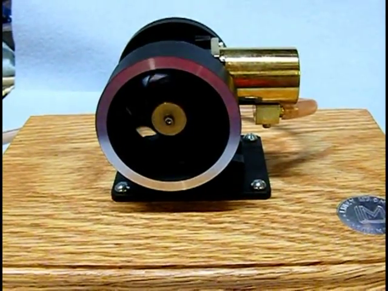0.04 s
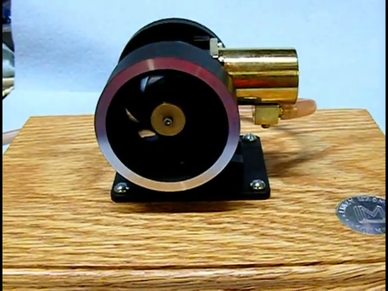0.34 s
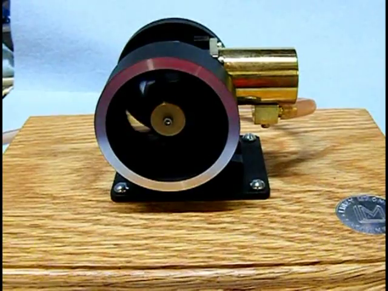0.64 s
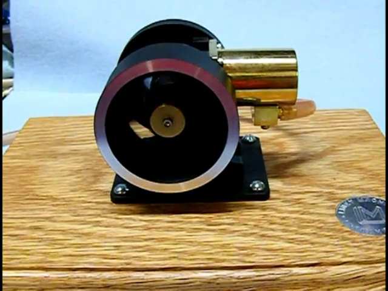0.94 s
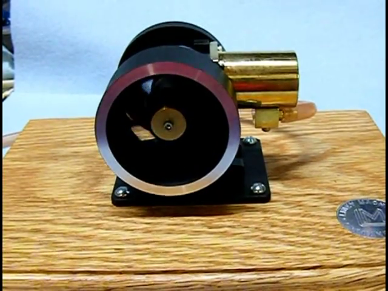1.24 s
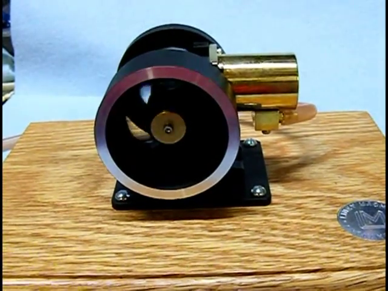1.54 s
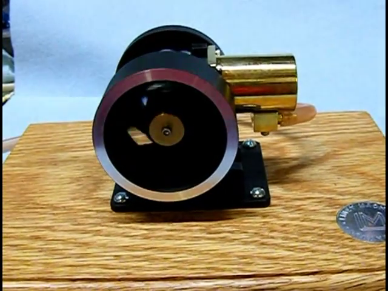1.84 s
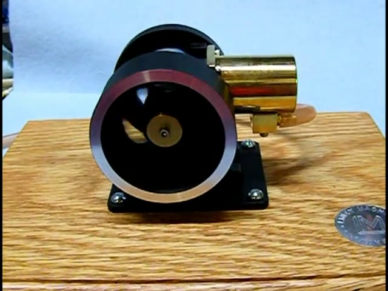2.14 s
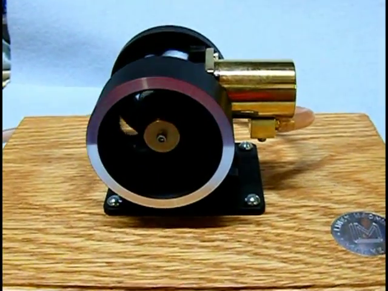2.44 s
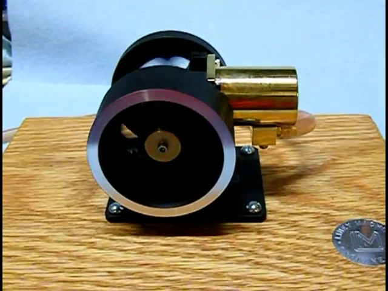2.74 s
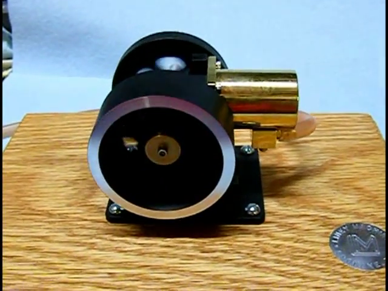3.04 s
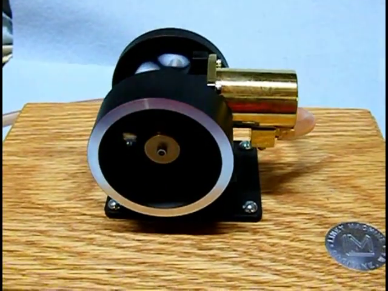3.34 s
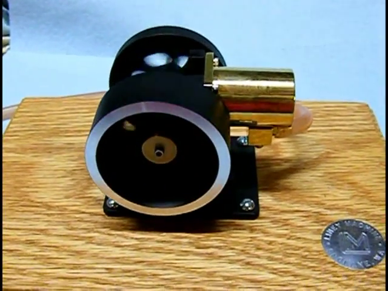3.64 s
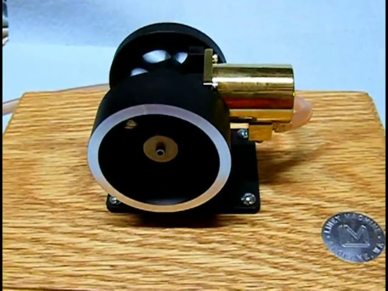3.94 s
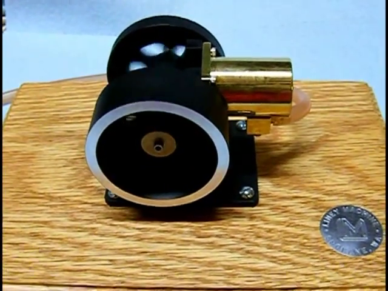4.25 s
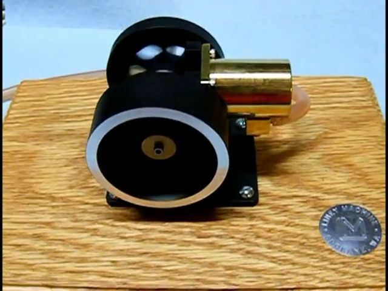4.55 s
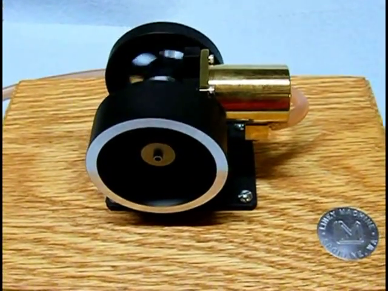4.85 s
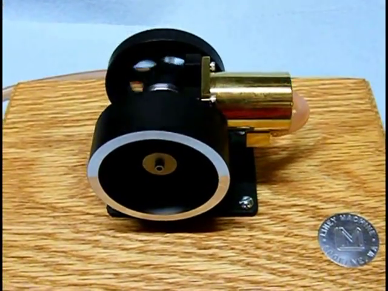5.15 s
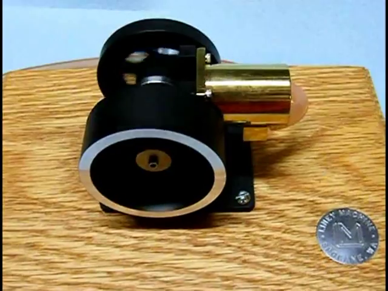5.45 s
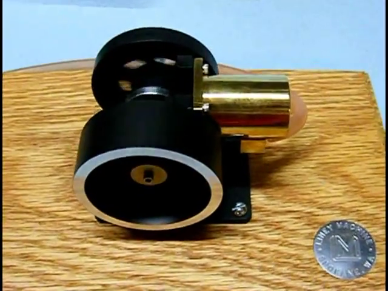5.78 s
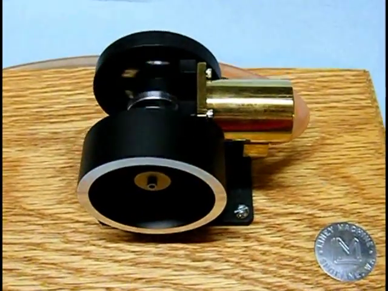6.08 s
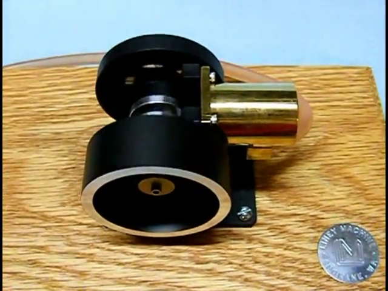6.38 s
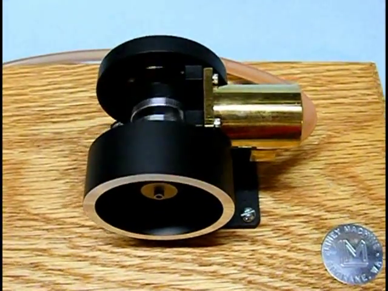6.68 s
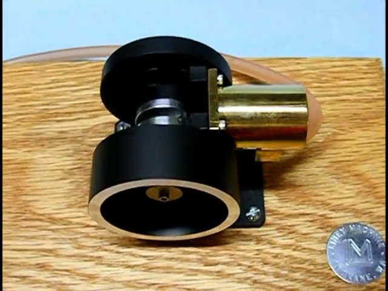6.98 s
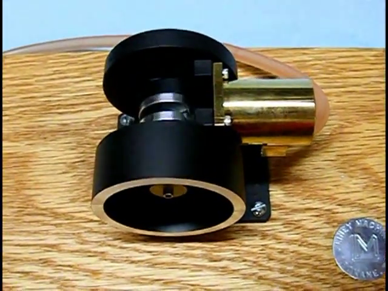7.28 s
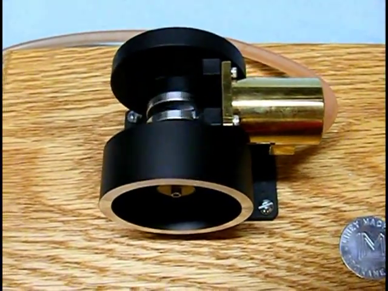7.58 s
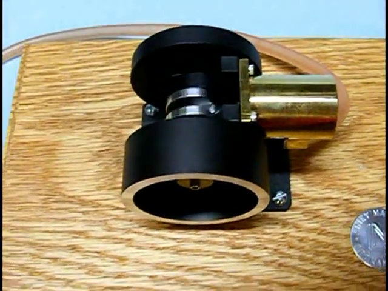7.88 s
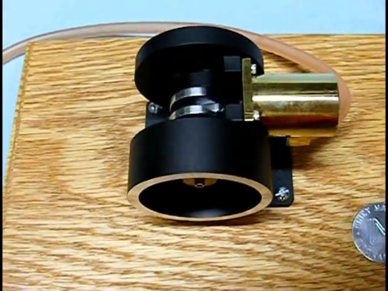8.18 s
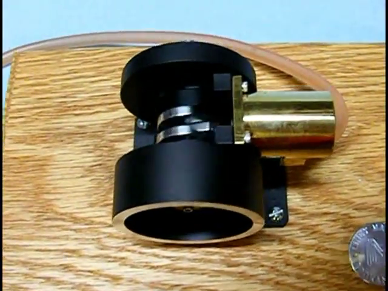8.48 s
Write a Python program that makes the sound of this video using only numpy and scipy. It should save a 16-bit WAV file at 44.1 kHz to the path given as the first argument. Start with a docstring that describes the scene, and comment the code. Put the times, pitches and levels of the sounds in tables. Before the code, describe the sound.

A small one-cylinder model engine runs on air on a wooden board, turning about three and a half times a second. Each turn gives a light metallic tick, a small knock and a faint puff. An air pump hums and fans whirr steadily throughout. The close microphone rises slowly over the engine, making the knocks a little fuller, and two brief dry scrapes come in the second half. The room is small and fairly dry.

```python
"""From the start an air pump buzzes through its line and fans whirr over a steady rush of air.
The pump drives a small one-cylinder model engine on a wooden board at 3.4 turns a second. In each turn
the valve rubs back, chirps by stick-slip friction, ticks and rebounds; exhaust puffs out, and the rod
knocks in its bearings, each impact ringing damped modes. From 1.5 s a close microphone rises slowly
over the engine, and near 5.9 s and 7.4 s come two brief dry scrapes."""
import sys
import numpy as np
from scipy import signal
from scipy.fft import rfft, irfft
from scipy.io import wavfile
from scipy.ndimage import uniform_filter1d

SR = 44100
rng = np.random.default_rng(int(sys.argv[2]) if len(sys.argv) > 2 else 0)


def file_out(sig):
    """Save sig as 16-bit WAV at sys.argv[1]."""
    # one column per channel
    cols = np.atleast_2d(sig).T
    # limit, then scale
    lim = np.clip(cols, -1, 1)
    pcm = np.round(lim * 32767).astype(np.int16)
    wavfile.write(sys.argv[1], SR, pcm)


N = 375732
TIME = np.arange(N) / SR
PUMP_HZ = 60.04  # stroke rate of the diaphragm

# once a turn the rod takes up its play: t/s, level/dB
ROD_KNOCKS = [(0.2272, -19), (0.519, -14.5), (0.8056, -19.5), (1.0938, -19), (1.3899, -22.5),
              (1.6743, -22.5), (1.9617, -19), (2.2713, -22.5), (2.546, -16.5), (2.854, -19),
              (3.1312, -14.5), (3.4386, -22), (3.7146, -14), (4.0129, -15.5), (4.3138, -14.5),
              (4.6085, -17.5), (4.8955, -15), (5.1956, -14.5), (5.4971, -14), (5.7863, -19.5), (6.068, -16),
              (6.3515, -19.5), (6.6427, -16), (6.9497, -16), (7.227, -14), (7.5372, -19), (7.8234, -17.5),
              (8.1229, -17), (8.4108, -14)]
# low modes of the frame: f/Hz, level/dB, t60/s
THUD_MODES = [(1134, 3, 0.026), (1050, -17, 0.012), (1354, -11.5, 0.0093)]
# the top of the valve gear comes into view: t/s, level/dB
GEAR_VIEW = [(0, -6), (2.7, -4.5), (4.5, -2), (6, 1.5), (8.5, 3)]


def amp(db):
    """Amplitude ratio of a level in decibels."""
    return 10 ** (np.asarray(db) / 20)


def unit_rms(x):
    """Normalisation to rms 1."""
    return x / np.sqrt(np.mean(x ** 2) + 1e-20)


def curve(rows, column=1):
    """Linear interpolation of a table column in time."""
    columns = np.transpose(rows)
    return np.interp(TIME, columns[0], columns[column])


def add(mix, s, sound):
    """Superposition of a sound on the mix, starting at s seconds."""
    part = mix[max(round(s * SR), 0):][:len(sound)]
    part += sound[:len(part)]


def noise(spectrum):
    """Spectral shaping of white noise, at rms 1."""
    hz, db = np.transpose(spectrum)
    gain = amp(np.interp(np.log(np.fft.rfftfreq(N, 1 / SR) + 1), np.log(hz), db))
    return unit_rms(irfft(rfft(rng.standard_normal(N)) * gain, N))


def drift(hz):
    """Low-pass random fluctuation of rms 1."""
    steps = np.arange(0, N / SR + 1, 1 / (2 * hz))
    wander = np.interp(TIME, steps, rng.standard_normal(len(steps)))
    return unit_rms(uniform_filter1d(wander, int(SR / hz / 4)))


def height():
    """Position of the microphone as it rises through the room's standing waves, from -.5 to .5."""
    return np.clip((TIME - 1.5) / 6.9, 0, 1) - .5


def valve_times(lead_s=.0669, slow_turn_share=.125):
    """Phase lead: the valve ticks about a quarter turn before each knock, earlier in a slow turn."""
    knock_s = np.transpose(ROD_KNOCKS)[0]
    turn_s = np.diff(knock_s)
    return knock_s - lead_s - slow_turn_share * np.r_[0, turn_s - turn_s.mean()]


def crank():
    """Phase of the crank in turns, whole at each valve tick."""
    ticks = valve_times()
    ticks = np.r_[2 * ticks[0] - ticks[1], ticks, 2 * ticks[-1] - ticks[-2]]
    return np.interp(TIME, ticks, np.arange(len(ticks)))


def pump(turns, bend_rad=1.39, waver_rad=0.11, throb=0.65, waver_db=0.78):
    """Modulation: through the air line, piston and valve swell and bend the diaphragm's harmonics."""
    # pump buzz: harmonic number, level/dB, swing with the crank (0-1), gain over the rise/dB
    harmonics = [(1, -50.5, 0, 0), (2, -34, 0.2, 1.5), (3, -46, 0.1, 6), (4, -41.5, 0.99, 3.5),
                 (5, -47.5, 0.8, -0.5), (6, -48.5, 0.8, 2), (8, -49, 0.92, 3.5), (9, -63.5, 0.96, 8),
                 (10, -45.5, 0.9, 2), (11, -46, 0.6, 10), (12, -59, 0, 6.5), (13, -50, 1, -1.5),
                 (15, -50, 0.7, 0.5), (17, -59.5, 0.2, -13), (19, -47, 0.5, -4), (20, -50.5, 1, 2.57),
                 (21, -59, 0.3, -3), (22, -50.5, 0.8, -3), (23, -58, 0.97, -2.5), (24, -52.5, 1, 1.5),
                 (25, -56.5, 0.6, -7.5)]
    highest = round(harmonics[-1][0])
    fading_top = [(highest + k + 1, -58.5 - 0.4 * k, .8, 0) for k in range(20)]
    out, rise = np.zeros(N), height()
    unsteady = waver_rad * drift(hz=5)
    for order, db, swing, rise_db in harmonics + fading_top:
        start, place, lag = rng.random(3)
        angle = 2 * np.pi * (turns + place)
        phase = 2 * np.pi * (round(order) * PUMP_HZ * TIME + start)
        phase += swing * (bend_rad * np.sin(angle + 2 * (lag - .5)) + unsteady)
        swell = 1 + throb * swing * np.cos(angle)
        out += amp(db + rise_db * rise) * unit_rms(swell * np.sin(phase))
    return out * amp(waver_db * drift(hz=5))


def fans(waver_db=1, wander_rad=0.45):
    """Tonal noise of fans in the room, with slow random modulation of phase and level."""
    # fan tones: f/Hz, level/dB, gain over the rise/dB
    tones = [(134.1, -44.5, 2), (253.07, -41.5, 1), (307.6, -49.5, 1), (406, -59, -1), (614.6, -43, 0.5),
             (922.5, -43.5, -4), (1980, -54, 1)]
    out = np.zeros(N)
    for hz, db, rise_db in tones:
        phase = 2 * np.pi * (hz * TIME + rng.random()) + wander_rad * drift(hz=1.5)
        out += amp(db + rise_db * height() + waver_db * drift(hz=2)) * unit_rms(np.sin(phase))
    return out


def air(turns, rumble_db=-34.1, rush_db=-35, flutter_depth=0.16):
    """Modulated noise: the board rumbles with each turn, the air flutters with both pump strokes."""
    # spectral densities of the low rumble, the rush of air and its treble edge: f/Hz, level/dB
    rumble_spectrum = [(15, -38.5), (35, -13.5), (52, -19), (77, 2), (95, -9), (135, 4.5), (200, 6.5),
                       (245, -3.5), (290, 4.5), (325, -5), (360, -1.5), (420, -16.5), (700, -69.5)]
    rush_spectrum = [(200, -6), (400, -1), (620, 3.5), (900, 0), (1180, -3.5), (1400, -4), (2000, -8),
                     (2700, -11.5), (3350, -16), (4100, -24.5), (5500, -32), (6500, -42), (7500, -57.5)]
    rush_edge = [(8600, -75), (10000, -100)]
    roll_db = 0.4 * np.cos(2 * np.pi * (turns - 0.902))
    rumble = noise(rumble_spectrum) * amp(rumble_db + 0.8 * height() + roll_db)
    rush = noise(rush_spectrum + rush_edge) * amp(rush_db + 0.9 * height())
    flutter = 1 + flutter_depth * np.sin(2 * np.pi * 2 * PUMP_HZ * TIME)
    return rumble + rush * flutter


def scuff(turns, db=-39, centre_turns=0.6267, width_turns=0.023):
    """Sliding friction: a faint rub as the valve moves back."""
    # spectrum of the rub: f/Hz, level/dB
    spectrum = [(500, -24.5), (1150, 6), (2000, -11), (2750, -2), (3120, 0), (3600, -13), (6000, -31),
                (8000, -55), (15000, -72)]
    swell = np.exp(-((turns % 1 - centre_turns) / width_turns) ** 2)
    return amp(db) * noise(spectrum) * swell


def chirp(hz=3110, length_s=0.00724, glide=0.037, rough_rad=0.14):
    """Stick-slip friction: the sliding valve gives a short, slightly falling squeak."""
    progress = np.linspace(0, 1, int(length_s * SR))
    pitch = hz * (1 + 0.0034 * rng.standard_normal() + glide * (.5 - progress))
    jitter = rng.standard_normal(len(progress))
    slip = unit_rms(signal.fftconvolve(jitter, signal.windows.hann(SR // 800), "same"))
    envelope = unit_rms(np.sin(np.pi * progress ** 1.3) ** 2)
    return envelope * np.sin(2 * np.pi * np.cumsum(pitch) / SR + rough_rad * slip)


def unit_blow(sound):
    """Normalisation to the energy of 10 ms at rms 1."""
    return sound / np.linalg.norm(sound) * np.sqrt(SR / 100)


def strike(partials, contact_s, chatter, tune=1, give_s=0.00033, spread=.006):
    """Impulse response: a blow with a brief chatter of contact excites damped sinusoids."""
    t = np.arange(SR // 20) / SR
    ring = np.zeros(len(t))
    for k, (hz, db, t60) in enumerate(partials):
        pitch = hz * tune * (1 + spread * rng.standard_normal())
        polarity = (-1) ** k  # neighbouring partials swing in opposition
        ring += polarity * amp(db - 60 * t / t60) * np.sin(2 * np.pi * pitch * t)
    ring *= (1 - np.exp(-t / give_s)) ** 3  # the metal gives before it rings
    force = rng.standard_normal(len(t)) * (t / contact_s) * np.exp(-2 * t / contact_s)
    force *= chatter / np.linalg.norm(force)
    force[0] += 1
    return unit_blow(signal.fftconvolve(force, ring)[:len(t)])


def valve(chirp_lead_s=.0268, rebound_lag_s=0.028):
    """Friction, then impact: the valve chirps, ticks evenly and rebounds, more clearly from above."""
    # ringing modes of the valve tick, and faint thin tones above 8 kHz that sound with each tick: f/Hz,
    # level/dB, t60/s
    tick_partials = [(3155, 8.5, 0.011), (3430, -11.5, 0.0093), (3700, -18.5, .010), (4900, -36, .007),
                     (7250, -36.5, .009), (8950, -39.5, .008), (12400, -44, .007), (14500, -45.5, .007)]
    # modes of the top of the valve gear: f/Hz, level/dB, t60/s
    top_modes = [(1770, -8, .006), (2120, -2.5, 0.0044), (2584, 6.5, 0.0099), (2940, 0.5, 0.0051),
                 (3700, -7.5, 0.013)]
    out, times = np.zeros(N), valve_times()
    top_db, rise = curve(GEAR_VIEW), height()
    for s, scatter in zip(times, rng.standard_normal(len(times))):
        now = int(s * SR)
        top = amp(top_db[now])
        balance = np.hypot(1, top)  # holds the tick's energy as its timbre shifts
        add(out, s - chirp_lead_s, amp(-32 - rise[now]) * chirp() / balance)
        tick = strike(tick_partials, contact_s=0.00044, chatter=0.28)
        tick += top * strike(top_modes, contact_s=0.0002, chatter=0.29)
        add(out, s, amp(-32) * tick / balance)
        rebound = strike(tick_partials, contact_s=.001, chatter=0.92)
        rebound += strike(top_modes, contact_s=0.00092, chatter=.7)
        add(out, s + rebound_lag_s, amp(-48.5 + 14 * rise[now] + 3 * scatter) * rebound)
        # the frame answers each of the three with a soft thud
        for lag in (-chirp_lead_s, 0, rebound_lag_s):
            add(out, s + lag, top * amp(-39) * strike(THUD_MODES, contact_s=0.0015, chatter=.5))
    return out


def exhaust(turns, centre_turns=0.1753, width_turns=0.0417):
    """Flow noise: spent air hisses out once a turn."""
    # spectrum of the puff: f/Hz, level/dB
    spectrum = [(1500, -5.5), (2400, 0.5), (3200, -2.5), (3550, -3), (3850, 0), (4100, -14), (6000, -30),
                (7250, -34), (7900, -49.5), (15000, -62.5)]
    swell = np.exp(-((turns % 1 - centre_turns) / width_turns) ** 2)
    return amp(-43 + curve(GEAR_VIEW) / 2) * noise(spectrum) * swell


def knock(modes, tune, bounce_db=-5, bounce_lag_s=0.002407):
    """Elastic rebound: a blow and its bounce excite the same modes."""
    sound = strike(modes, contact_s=0.0015, chatter=0.67, tune=tune)
    lag = bounce_lag_s * rng.uniform(.8, 1.2)
    add(sound, lag, amp(bounce_db) * strike(modes, contact_s=0.00073, chatter=0.99, tune=tune))
    return unit_blow(sound)


def rod(snap_hardness=0.37):
    """Impact across a clearance: the rod knocks in its bearings, slowly rising in pitch."""
    # sharp snap of the knock, plus a very faint sizzle above 8 kHz: f/Hz, level/dB, t60/s
    snap_partials = [(4500, 5.5, 0.0047), (5327, -4, 0.0044), (6300, -13, 0.011), (7000, -23, 0.0073),
                     (8720, -30, .008), (10600, -30, .005), (12400, -31.5, .006), (14300, -30.5, .006)]
    # middle and high modes of the frame: f/Hz, level/dB, t60/s
    clack_modes = [(1890, -10.5, 0.0083), (2086, 8.5, 0.013), (2320, -3, 0.0065), (2600, -12, .007)]
    ring_modes = [(3222, 5, 0.012), (3650, -4.5, 0.0082), (3925, -15.5, 0.0031)]
    # transfer from frame to microphone: t/s, thud level/dB, clack level/dB, ring level/dB
    transfer = [(0, -15.5, -25, -18), (2.1, -12, -29, -19.5), (3.4, -14.5, -20, -18),
                (5.5, -12.5, -16, -21), (8.5, -10, -20, -24)]
    thud, clack, ring = np.zeros((3, N))
    mean_db = np.mean(np.transpose(ROD_KNOCKS)[1])
    for s, db in ROD_KNOCKS:
        progress = s / TIME[-1]
        snap = amp(db - 19 + snap_hardness * (db - mean_db))  # a harder knock is brighter
        # the knock snaps first and again as it bounces; the heavier parts ring on
        add(ring, s, snap * strike(snap_partials, contact_s=0.00076, chatter=0.36, give_s=.0001))
        bounce = strike(snap_partials, contact_s=.002, chatter=1.5, give_s=.0001)
        add(ring, s + 0.0021, snap * amp(-8) * bounce)
        add(ring, s, amp(db) * knock(ring_modes, tune=1 + .015 * progress))
        add(clack, s + .0001, -amp(db) * knock(clack_modes, tune=1 + .1 * progress))
        add(thud, s + .0002, amp(db) * knock(THUD_MODES, tune=1 + .04 * progress))
    return sum(part * amp(curve(transfer, k)) for k, part in enumerate((thud, clack, ring), start=1))


def scrapes():
    """Friction noise: gritty rubs that start quickly and die away."""
    # dry scrapes: t/s, duration/s, level/dB
    rubs = [(5.921, 0.0426, -22.5), (7.369, 0.044, -24.5)]
    # their spectrum: f/Hz, level/dB
    spectrum = [(700, -23), (1600, 1), (2200, 4), (3200, -1.5), (4200, -9), (6000, -32), (7500, -42),
                (9000, -55), (15000, -60)]
    swell = np.zeros(N)
    for s, length_s, db in rubs:
        age = np.maximum(TIME - s, 0) / length_s * 5
        swell += amp(db) * age * np.exp(1 - age)
    return swell * noise(spectrum) * amp(2.5 * drift(hz=500) - 6)


def room(x, t60=0.12, wet_db=-12, backdrop_s=0.0076, backdrop_db=-21, echoes_per_s=2000):
    """Reflection: an echo from the backdrop and the sparse reverberation of a small room."""
    t = np.arange(SR // 3) / SR
    signs = rng.choice([-1., 1.], len(t))
    arrivals = (rng.random(len(t)) < echoes_per_s / SR) * (t > .004)
    taps = signs * arrivals * amp(-60 * t / t60)
    taps *= amp(wet_db) / np.linalg.norm(taps)
    taps[round(backdrop_s * SR)] += amp(backdrop_db)
    return x + signal.fftconvolve(x, taps)[:N]


def scene():
    """Superposition of the engine and its reflections on the pump, fans and air."""
    turns = crank()
    engine = valve() + rod() + scrapes() + exhaust(turns) + scuff(turns)
    return (room(engine) + pump(turns) + fans() + air(turns))[None]


def record(dry, hiss_db=-91, cutoff_hz=15700):
    """Noise floor and band limit: faint white hiss, then a low-pass filter."""
    hissy = dry + amp(hiss_db) * rng.standard_normal(N)
    lowpass = signal.firwin(511, cutoff_hz, window=("kaiser", 9), fs=SR)
    return signal.oaconvolve(hissy, lowpass[None], "same")


dry = scene()
out = record(dry)
file_out(out)
```